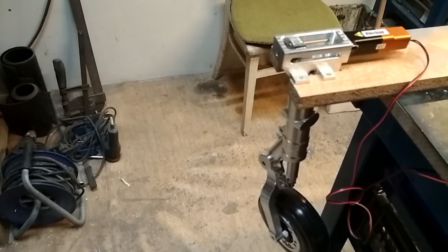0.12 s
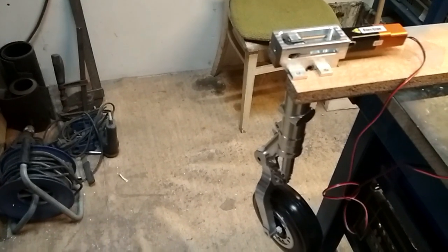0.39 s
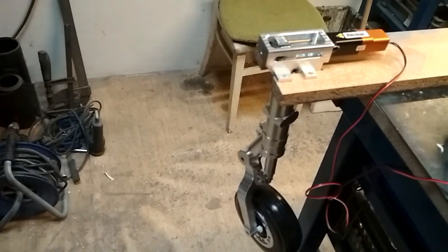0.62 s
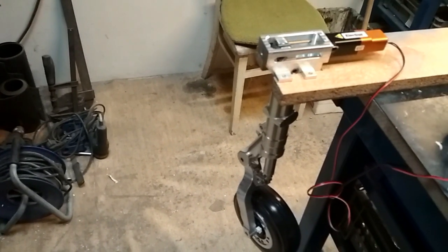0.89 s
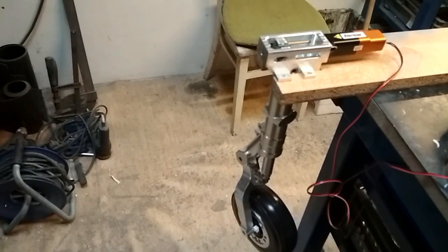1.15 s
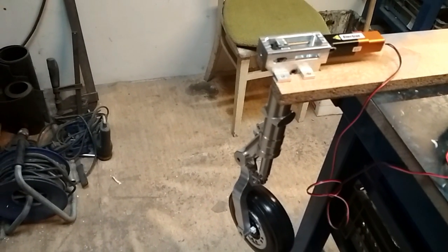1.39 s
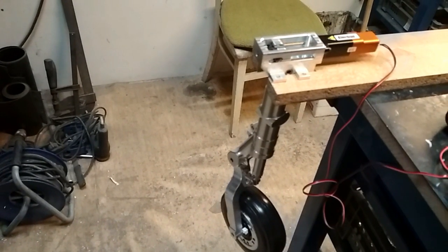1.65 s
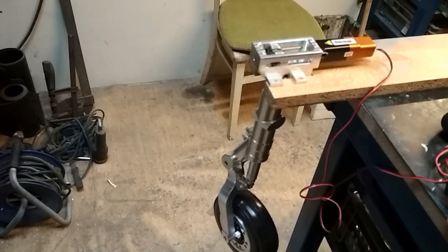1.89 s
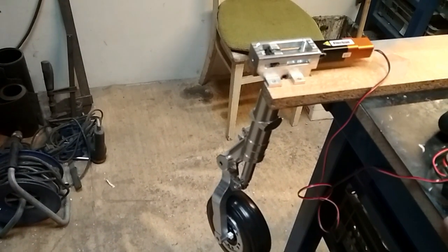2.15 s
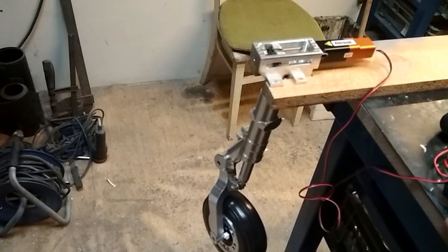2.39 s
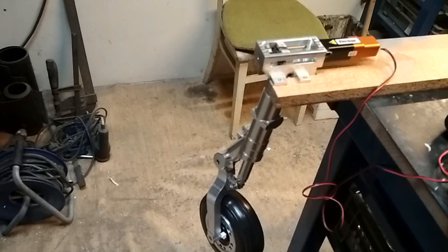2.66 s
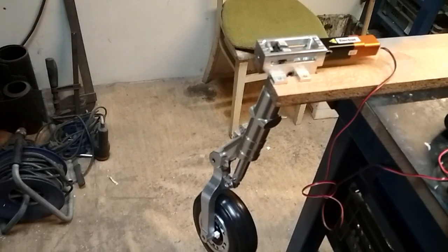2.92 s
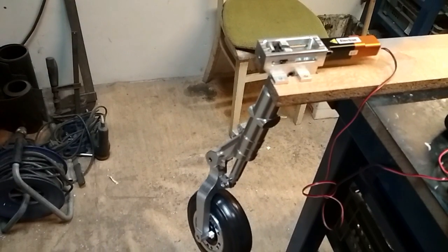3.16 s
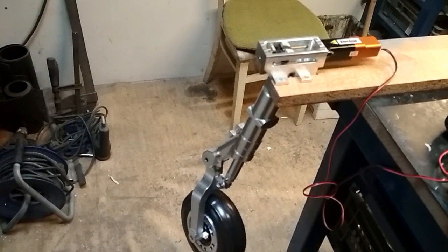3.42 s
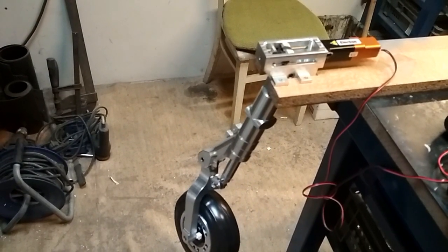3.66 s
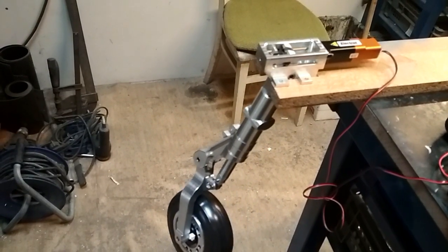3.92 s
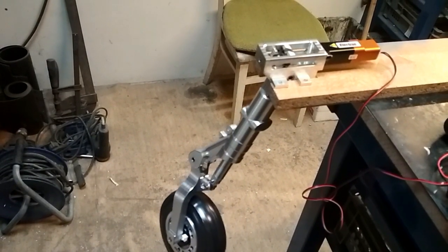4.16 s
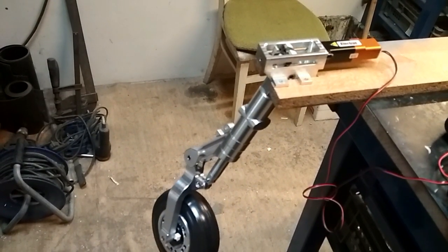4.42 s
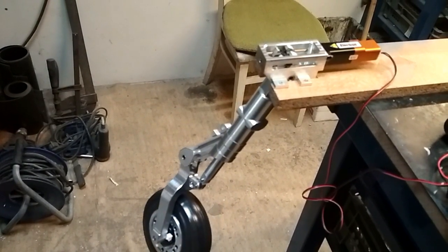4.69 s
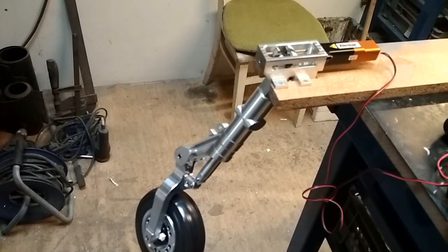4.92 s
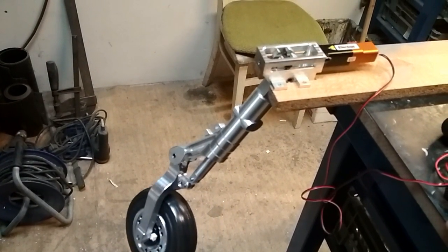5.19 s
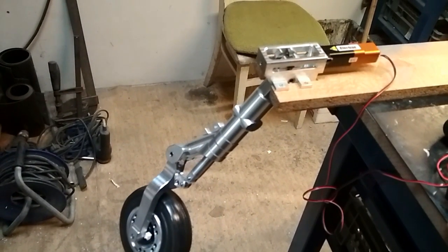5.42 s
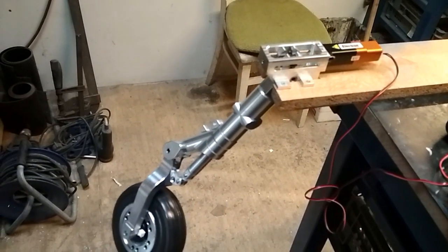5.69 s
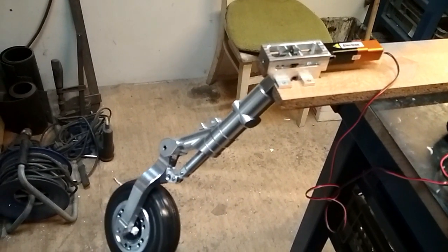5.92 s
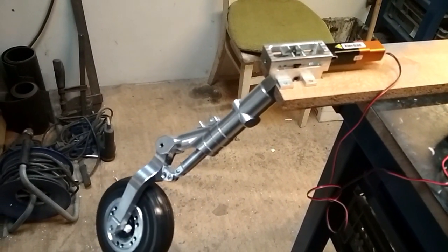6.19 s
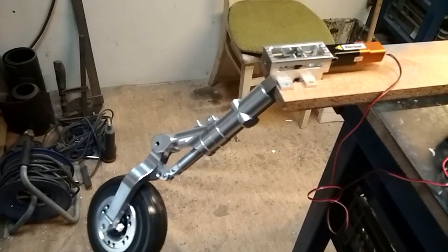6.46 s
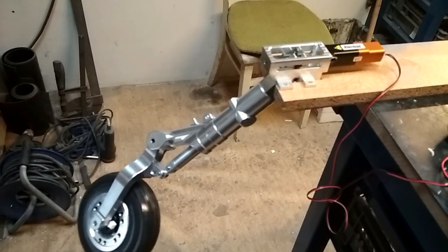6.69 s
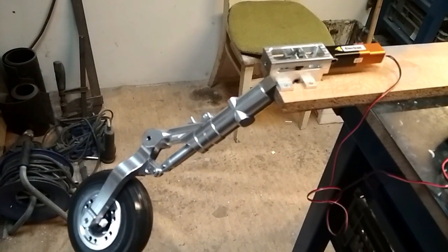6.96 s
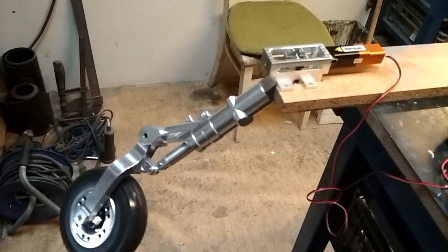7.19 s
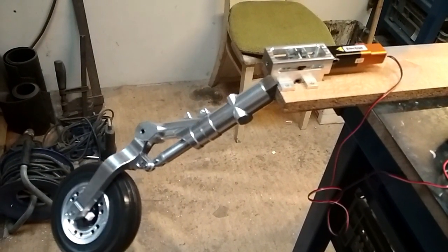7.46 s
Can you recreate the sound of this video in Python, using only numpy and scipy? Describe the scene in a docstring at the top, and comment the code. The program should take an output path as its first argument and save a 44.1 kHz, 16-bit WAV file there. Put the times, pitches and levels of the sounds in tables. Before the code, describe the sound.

A small brushed electric motor is already running at 0 s, close to a handheld stereo microphone, on a wooden bench in a quiet workshop. Its buzzing hum sits near 250 Hz with stacked overtones, under a prominent bright, grainy hiss from brushes and gear teeth; very low room rumble lies beneath. Around 0.3 s the overtone balance shifts slightly. Near 0.55 s a hand moves on the microphone with a short dull bump, and the slightly shaded treble opens into a crisper sizzle. The pitch stays nearly steady until about 3 s, then sags, rises briefly near 3.8 s and sinks again, reaching about 229 Hz by 7.6 s. As load grows, individual overtones swell and fade differently in each ear, and a slow throb of roughly four or five pulses per second deepens. The hiss grows a little stronger; the motor never stops.

```python
"""From t = 0 a small brushed motor hums in multiples of its shaft speed, near 250 turns/s, on a wooden bench.
Brush and tooth noise hisses with it, pulsed by the commutator, above the low rumble of a quiet workshop.
Near 0.55 s a hand shifts on the stereo microphone with a dull bump, and the shaded treble opens.
From about 3 s the pitch sags, rises briefly near 3.76 s, then falls to about 229 turns/s: the gear train
and lead screw lift a model landing leg, and the growing load makes the hum throb with each screw turn."""
import sys
import numpy as np
from scipy import signal
from scipy.fft import rfft, irfft
from scipy.io import wavfile
from scipy.ndimage import uniform_filter1d

SR = 44100
rng = np.random.default_rng(int(sys.argv[2]) if len(sys.argv) > 2 else 0)


def log_audio(samples):
    """Write samples as a 16-bit WAV file to the path given in sys.argv[1]."""
    # one column per channel
    frames = np.atleast_2d(samples).T
    # limit to full scale, then quantise
    limited = np.clip(frames, -1, 1)
    pcm = np.round(limited * 32767).astype(np.int16)
    wavfile.write(sys.argv[1], SR, pcm)


def volts_from_db(level):
    """Convert decibel levels to linear amplitude ratios."""
    exponent = np.asarray(level, float) / 20
    return 10 ** exponent


N = 334278   # samples

# Shaft speed before the binding of the screw: t/s, speed/(turns/s)
SHAFT_SPEED = [(0.0, 249.7), (0.15, 248.5), (0.3, 249.6), (1.25, 250.1), (1.5, 249.0), (1.8, 248.2),
               (2.1, 248.5), (3.05, 248.4), (3.4, 246.1), (3.66, 244.5), (3.76, 248.0), (4.05, 245.0),
               (4.4, 241.2), (5.25, 239.8), (5.7, 237.6), (5.84, 234.2), (6.0, 235.7), (7.1, 231.9),
               (7.58, 229.2)]
FREE_SPEED = 250   # turns/s without load
GEAR_RATIO, SCREW_START_RAD = 53.3, 3.06   # shaft turns per screw turn, first screw angle
LIGHT_LOAD, HEAVIER_LOAD = 0.45, 4.7   # speed lost/(turns/s), between which the hiss changes colour

# Orders of the strong harmonics: multiple of shaft speed
STRONG_ORDERS = [1, 2, 3, 4, 5, 6]
# Bench and room favour some pitches and cancel others; one table for each strong harmonic:
# speed lost/(turns/s), left level/dB, right level/dB, phase by which left leads/rad
STRONG_RESPONSE = [
    [(2.2, -55.5, -53.6, -.25), (3.5, -61, -60, -.2), (5, -66, -66, -.2), (6.5, -75, -74, 0),
     (8.5, -66, -63, 0), (21, -66, -62, .1)],
    [(.3, -83, -76, -.5), (2, -82, -72, -.5), (4, -86, -71, -.5), (5.5, -80, -71, -.5),
     (7.5, -85, -80, -.5), (12, -84, -81, -.5), (15, -90, -88, -.5), (21, -93, -93, -.5)],
    [(-.3, -57, -66, -2.6), (.5, -61, -63, -2.6), (1.3, -74, -54, -2.6), (2.4, -71, -54, -1),
     (3.5, -68, -58, .6), (6, -75, -65, -1.3), (9, -71, -71, -3.5), (12, -73, -63, -3), (18, -75, -59, -.2),
     (21, -64, -74, -.4)],
    [(.3, -61, -62, -2), (1.6, -56, -59, -1.7), (3, -66, -66, -1.1), (6, -68, -63, -1), (9, -75, -78, .3),
     (12, -75, -74, -.3), (14, -73, -62, -.9), (15.5, -72, -59, -.9), (17.5, -73, -64, -1.2),
     (19, -74, -66, -1.5), (21, -77, -73, -1.9)],
    [(-.3, -61, -77, 1.1), (.6, -62, -72, .7), (1.8, -71, -73, .8), (4.5, -63, -63, -.2),
     (6, -72, -69, -.8), (9, -64, -59, -.7), (12, -63, -58, -1.7), (15, -59, -66, -1.2), (18, -75, -72, -1),
     (21, -67, -64, -.3)],
    [(1.6, -65, -66, 2.9), (5, -69, -66, 3), (10, -71, -74, 2.8), (15, -76, -77, 2.4), (21, -66, -65, 2.6)],
]
# Part of each strong harmonic that arrives by shifting reflections: level/dB
STRONG_SCATTER_DB = [-76.5, -92, -75.5, -77, -76, -76.5]
# Throb with the screw, for each strong harmonic: depth/dB, lateness/rad, onset as speed lost/(turns/s)
SCREW_THROB = [(2, 0, 6), (6, -1.5, 5), (.5, .6, 11), (2.3, .4, 12), (3, 0, 13), (.5, 0, 9)]
# Opening offset of each strong harmonic (the fifth louder, the others softer): level/dB
OPENING_OFFSET_DB = [-4, -6.5, -7, -3.5, 3, -8]
OPENING_END_S, OPENING_CHANGE_S = 0.31, 0.024   # centre and time constant of the change
BENCH_SETTLE_S = 0.018   # time constant with which the bench follows a change of pitch

# Weak harmonics, before a common raise: multiple, then left and right level/dB at each of four loads
WEAK_HARMONICS = [(7, -75, -73, -76, -68, -72, -73, -75, -76), (8, -73, -77, -75, -75, -77, -75, -70, -72),
                  (9, -75, -79, -73, -74, -73, -77, -81, -78), (10, -73, -76, -79, -79, -76, -77, -74, -76),
                  (11, -74, -77, -78, -83, -82, -84, -81, -86),
                  (12, -73, -79, -76, -75, -75, -78, -78, -83),
                  (13, -76, -79, -76, -75, -77, -77, -80, -81),
                  (14, -74, -79, -75, -78, -79, -78, -80, -81),
                  (15, -73, -78, -71, -77, -73, -76, -73, -78),
                  (16, -77, -78, -75, -78, -77, -87, -78, -81),
                  (17, -75, -81, -77, -82, -75, -79, -75, -81),
                  (18, -75, -78, -74, -81, -79, -80, -80, -80),
                  (19, -82, -81, -78, -83, -74, -77, -81, -84),
                  (20, -80, -85, -77, -90, -82, -81, -75, -81),
                  (21, -83, -83, -83, -88, -78, -81, -80, -91),
                  (22, -85, -82, -79, -81, -85, -84, -79, -84),
                  (23, -85, -86, -89, -88, -79, -80, -86, -89),
                  (24, -79, -76, -79, -77, -79, -79, -77, -83),
                  (25, -83, -83, -82, -80, -81, -83, -84, -81),
                  (26, -86, -82, -87, -84, -87, -87, -90, -90),
                  (27, -84, -80, -86, -80, -85, -81, -87, -85),
                  (28, -80, -78, -80, -78, -80, -82, -79, -78)]
# The four loads: speed lost/(turns/s)
WEAK_LOADS_LOST = [.3, 1.7, 6.5, 16]
WEAK_WAVER_DB, WEAK_SCATTER_DB = 2.5, -9   # level waver, shifting reflections relative to the tone
WEAK_WANDER_RAD = 0.035   # phase wander per multiple
# Faint tones between the harmonics: multiple of shaft speed, left level/dB, right level/dB,
# onset as speed lost/(turns/s)
FRACTIONAL_TONES = [(1.67, -88, -87, 9), (3.205, -84, -78, 9), (3.78, -84, -80, 11), (5.5, -82, -82, -5),
                    (23.2, -82, -82, -3), (25.2, -81, -81, -5)]

# Hiss, before a common raise: t/s, level/dB, housing resonance f/Hz, resonance height/dB
HISS_COURSE = [(0, -54, 11300, 0), (.5, -53.3, 11400, 1), (.6, -52.3, 11550, 4.5), (.95, -51, 11800, 6),
               (1.8, -51, 12100, 5), (3.5, -50.5, 12150, 4), (5, -50, 12200, 4), (6.5, -49.5, 12250, 4),
               (7.25, -49, 12300, 3), (7.58, -49, 12200, 4)]
# Relative hiss spectrum: f/Hz, light load left level/dB, light load right level/dB,
# heavier load left level/dB, heavier load right level/dB, likeness of the ears (0 to 1)
HISS_SPECTRUM = [(200, -17, -16, -17, -16, .5), (290, -14, -13, -24, -22, .45),
                 (335, -25, -23, -31, -31, .35), (390, -28, -28, -16, -15, .4),
                 (460, -29, -29, -23, -22, .3), (530, -26, -24, -24, -23, .4),
                 (600, -21, -18, -20, -18, .6), (720, -17, -18, -15, -15, .45),
                 (820, -15, -18, -17, -20, .3), (920, -14, -16, -11, -13, .3),
                 (1150, -13, -12, -11, -7, .3), (1400, -15, -15, -12, -11, .25),
                 (1550, -22, -23, -20, -19, .25), (1750, -16, -17, -15, -15, .3),
                 (2100, -12, -13, -12, -13, .45), (2800, -13, -16, -11, -13, .4),
                 (3300, -14, -15, -11, -12, .45), (3900, -11, -14, -9, -12, .5),
                 (4500, -11, -15, -10, -12, .4), (5300, -16, -18, -11, -15, .25),
                 (6000, -16, -16, -12, -12, .3), (7000, -12, -9, -12, -9, .25), (8100, -6, -6, -7, -3, .2),
                 (8900, -9, -3, -8, -3, .2), (10200, -7, 0, -5, 2, .3), (11300, -5, -1, -4, -2, .2),
                 (12200, -3, -2, -1, -3, .2), (13300, -2, -4, 1, -3, .2), (14300, -6, -9, -5, -9, .2),
                 (15200, -11, -11, -9, -9, .3), (15800, -12, -13, -11, -12, .4)]
# Brush noise on each of the five commutator segments: level/dB
BRUSH_SEGMENT_DB = [0.43, -1.9, 0.78, -1, -0.32]
HOUSING_WIDTH_HZ = 650   # full width at half the dB height
LEFT_LAG_S = 7.5 / SR   # left ear behind right
# Shading of the treble until the hand shifts, left then right: level/dB
HAND_SHADE_DB = [-4.5, -0.5]
SHADE_HZ, SHADE_WIDTH_HZ = 8800, 4600

# Relative rumble spectrum: f/Hz, level/dB
ROOM_SPECTRUM = [(25, -13), (40, 1.5), (55, -9), (67, 8), (85, -6.5), (105, -1.5), (135, 2.5), (170, -9),
                 (260, 3), (500, -59)]
ROOM_DB, ROOM_LIKENESS = -76, 0.69   # mean rumble level, likeness of the ears
# Shifts of the hand on the microphone: t/s, nominal level/dB (the pulse shape scales it)
HAND_SHIFTS = [(0.549, -56)]

# Gate threshold relative to the spectral surroundings: f/Hz, level/dB
GATE_THRESHOLD = [(1300, -40), (1550, -7), (1900, -7), (2500, -3.6), (3200, -2.6), (4000, -2.7),
                  (6000, -1.5), (8000, -2.4), (11000, -5.5), (13000, -4.5), (14200, -3), (15000, -2.3)]
FRAME = 1024   # samples per spectral frame


def rms_one(x):
    """Normalise a signal to unit root-mean-square value."""
    return x / np.sqrt(np.mean(x ** 2) + 1e-20)


def in_time(rows):
    """Interpolate the columns of a time table linearly, one value per sample."""
    s, *columns = np.transpose(rows)
    return [np.interp(np.arange(N) / SR, s, c) for c in columns]


def in_pitch(rows, hz):
    """Interpolate the columns of a spectral table on a logarithmic frequency axis."""
    at, *columns = np.transpose(rows)
    return [np.interp(np.log(hz + 1), np.log(at), c) for c in columns]


def drift(rate_hz, count):
    """Rows of slow random fluctuation of unit rms: white noise through two equal low-pass poles."""
    step = 40   # samples between drawn values
    r = np.exp(-2 * np.pi * rate_hz * step / SR)
    white = rng.standard_normal((count, N // step + 2002))
    slow = signal.lfilter([1], [1, -2 * r, r * r], white)[:, 2000:]
    at = np.arange(N) / step
    return np.array([np.interp(at, np.arange(len(row)), rms_one(row)) for row in slow])


def field(shape, bins, frames):
    """Random field of unit rms, smoothed over frequency bins and time frames."""
    smooth = uniform_filter1d(rng.standard_normal(shape), size=int(frames), axis=-1)
    return rms_one(uniform_filter1d(smooth, size=int(bins), axis=-2))


def shaft():
    """Angle is the integral of speed; the lead screw binds once a turn, more strongly under load."""
    speed, = in_time(SHAFT_SPEED)
    load = np.clip(FREE_SPEED - speed, 0, None)
    screw = 2 * np.pi * np.cumsum(speed) / SR / GEAR_RATIO + SCREW_START_RAD
    speed = speed + (0.25 + 0.055 * load) * np.cos(screw)
    unsteady = speed + 0.35 * drift(9, count=1)[0]
    angle = 2 * np.pi * np.cumsum(unsteady) / SR
    return angle, screw, load, FREE_SPEED - speed


def screw_swell(screw, load):
    """Phase of the swell per screw turn: it lags more as speed falls below the bench resonance."""
    return screw - 2.6 - 0.15 * load


def strong_harmonics(angle, screw, load, lost):
    """Harmonics of rotation pass bench and room resonances, so each swells and sinks with speed."""
    out = np.zeros((2, N))
    r = np.exp(-1 / (BENCH_SETTLE_S * SR))
    settled = signal.lfilter([1 - r], [1, -r], lost, zi=[r * lost[0]])[0]
    swell = screw_swell(screw, load)
    opening = (1 - np.tanh((np.arange(N) / SR - OPENING_END_S) / OPENING_CHANGE_S)) / 2
    settings = zip(STRONG_ORDERS, STRONG_RESPONSE, SCREW_THROB, STRONG_SCATTER_DB, OPENING_OFFSET_DB)
    for k, rows, (depth_db, behind, onset), scatter_db, opening_db in settings:
        at, *columns = np.transpose(rows)
        left_db, right_db, lead = [np.interp(settled, at, c) for c in columns]
        beat = swell - behind
        loaded = np.clip((load - onset) / 3, 0, 1)
        throb_db = depth_db * loaded * (np.cos(beat) - 0.42 * np.cos(2 * beat))
        waver_db = 0.25 * np.sqrt(k) * drift(20, count=1)   # higher harmonics waver more
        level = volts_from_db(np.array([left_db, right_db]) + throb_db + opening_db * opening + waver_db)
        phase = k * angle + k * k + lead * np.array([[1], [0]])
        # reflections in phase and in quadrature, separate for each ear
        in_step, across = volts_from_db(scatter_db) * drift(9.8, count=4).reshape(2, 2, N)
        out += (level + in_step) * np.cos(phase) + across * np.sin(phase)
    return np.sqrt(2) * out   # table levels are rms


def weak_harmonics(angle, load):
    """Higher harmonics of rotation, whose levels depend on load and whose phases wander at random."""
    out = np.zeros((2, N))
    for k, *level_db in WEAK_HARMONICS:
        ears_db = [np.interp(load, WEAK_LOADS_LOST, ear) for ear in np.reshape(level_db, (-1, 2)).T]
        waver, shift, *wander = drift(9.3, count=4)
        level = volts_from_db(ears_db + WEAK_WAVER_DB * waver + 1.6)
        level = level * (1 + volts_from_db(WEAK_SCATTER_DB) * shift * [[1], [-1]])
        # path difference between the ears, turned at random by reflections
        late = 2 * np.pi * k * FREE_SPEED * LEFT_LAG_S + rng.normal(0, 0.35)
        wander = WEAK_WANDER_RAD * k * np.array(wander)
        out += level * np.cos(k * angle + k * k - np.array([[late], [0]]) + wander)
    return np.sqrt(2) * out


def fractional_tones(angle, screw, load):
    """Faint tones at fractional multiples of shaft speed, amplitude-modulated once per screw turn."""
    out = np.zeros((2, N))
    swell = screw_swell(screw, load)
    for k, *level_db, onset in FRACTIONAL_TONES:
        loaded = np.clip((load - onset) / 5, 0, 1)
        level = volts_from_db(np.c_[level_db] - 4 * np.cos(swell + 1) + 2 * drift(5, count=1))
        out += loaded * level * np.cos(k * angle)
    return np.sqrt(2) * out


def brush_noise(angle, screw):
    """Sliding contact gives white noise, amplitude-modulated by commutator segments and screw effort."""
    segment = len(BRUSH_SEGMENT_DB) * angle / (2 * np.pi)
    segment_db = np.take(BRUSH_SEGMENT_DB, segment.astype(int) % len(BRUSH_SEGMENT_DB))
    pulse_db = segment_db + 2 * np.cos(2 * np.pi * segment + np.pi)
    grain_db = 0.5 * uniform_filter1d(rng.standard_normal(N), size=25) * 5   # 0.5 dB rms
    effort_db = 0.3 * drift(6, count=1) - 0.55 * np.cos(screw - 1.1)
    return rng.standard_normal((3, N)) * volts_from_db(pulse_db + grain_db + effort_db)


def hiss(angle, screw, load):
    """Brush and tooth noise is coloured by load and housing resonance; reflections decorrelate the ears."""
    level_db, centre_hz, housing_db = in_time(HISS_COURSE)
    hz, s, (direct, *own) = signal.stft(brush_noise(angle, screw), SR, nperseg=FRAME)
    at = np.minimum((s * SR).astype(int), N - 1)
    f = hz[:, None]
    spectrum = np.array(in_pitch(HISS_SPECTRUM, hz))[:, :, None]
    left_light, right_light, left_heavier, right_heavier, alike = spectrum
    loaded = (load - LIGHT_LOAD) / (HEAVIER_LOAD - LIGHT_LOAD)
    loaded = np.clip(loaded[at], 0, 1)
    housing = 1 / (1 + (2 * (f - centre_hz[at]) / HOUSING_WIDTH_HZ) ** 2)
    # direct sound and the housing ring are shared; reflections differ between the ears
    alike = np.clip(alike, 0, 0.9)
    alike = alike + (0.9 - alike) * 0.5 * housing
    late = np.exp(-2j * np.pi * f * LEFT_LAG_S)
    # narrow bands of the hiss rise and fall at random, partly alike in both ears
    shape = (3, *direct.shape)
    chance = field(shape, bins=2, frames=60) + 0.5 * field(shape, bins=3, frames=6)
    band_depth_db = 2.5 * np.interp(hz, [800, 2500, 7000, 11000], [0.2, 1, 1, 0.7])[:, None]
    bands_db = band_depth_db * (chance[0] + 0.6 * chance[1:])
    shade = (s < HAND_SHIFTS[0][0]) / (1 + (2 * (f - SHADE_HZ) / SHADE_WIDTH_HZ) ** 2)
    low_cut = 1 / np.sqrt(1 + (210 / (f + 1)) ** 8)
    ears = []
    settings = zip((left_light, right_light), (left_heavier, right_heavier), (late, 1), own,
                   bands_db, HAND_SHADE_DB)
    for light_db, heavier_db, lag, diffuse, band_db, shade_db in settings:
        # random patches of the hiss swell and sink, separately in each ear
        patches_db = 0.23 * field(direct.shape, bins=21, frames=11)
        colour_db = light_db + loaded * (heavier_db - light_db) + housing_db[at] * housing
        gain = low_cut * volts_from_db(colour_db + patches_db + band_db + shade_db * shade)
        ears.append(gain * (np.sqrt(alike) * lag * direct + np.sqrt(1 - alike) * diffuse))
    out = signal.istft(np.array(ears), SR, nperseg=FRAME)[1][:, :N]
    slow_rms = np.sqrt(uniform_filter1d(np.mean(out ** 2, axis=0), size=SR, mode="reflect"))
    return volts_from_db(level_db + 3.5) * out / slow_rms


def room_rumble():
    """Low room noise is partly coherent: a common part plus a part of opposite sign in the two ears."""
    colour_db, = in_pitch(ROOM_SPECTRUM, np.arange(N // 2 + 1) * SR / N)
    mid, side = irfft(rfft(rng.standard_normal((2, N))) * volts_from_db(colour_db), N)
    ears = np.sqrt(1 + ROOM_LIKENESS) * mid + np.sqrt(1 - ROOM_LIKENESS) * side * [[1], [-1]]
    return volts_from_db(ROOM_DB + 2 * drift(7.4, count=1)) * rms_one(ears)


def hand_bumps():
    """A shift of grip displaces the microphone: a short damped pressure pulse with one reversal."""
    out = np.zeros((2, N))
    for s, level_db in HAND_SHIFTS:
        age = np.clip(np.arange(N) / SR - s, 0, None) / 0.002   # in decay times of 2 ms
        pulse = age * (1.6 - age) * np.exp(-age)
        out += volts_from_db(level_db + 4) * pulse * np.array([[1.1], [0.8]])
    return out


def scene():
    """Superpose the hum and hiss, which share one shaft motion, with the room and the hand."""
    angle, screw, load, lost = shaft()
    whine = strong_harmonics(angle, screw, load, lost) + weak_harmonics(angle, load)
    whine = whine + fractional_tones(angle, screw, load)
    return whine + hiss(angle, screw, load) + room_rumble() + hand_bumps()


def top_cut(x):
    """Nothing passes above the cut-off."""
    return signal.sosfilt(signal.butter(12, 15790, fs=SR, output="sos"), x)


def record(dry):
    """A spectral gate attenuates by 24 dB the narrow slots that fall below their surroundings."""
    hz, s, spectrum = signal.stft(dry, SR, nperseg=FRAME)
    power = uniform_filter1d(abs(spectrum) ** 2, size=3, axis=1)
    power = uniform_filter1d(power, size=3, axis=2)
    level_db = 10 * np.log10(power + power[::-1] + 1e-20)   # both ears together
    around_db = uniform_filter1d(uniform_filter1d(level_db, size=41, axis=1), size=40, axis=2)
    threshold_db, = in_pitch(GATE_THRESHOLD, hz)
    below = level_db - around_db < threshold_db[:, None]
    shut = uniform_filter1d(1.0 * below, size=3, axis=1) > 0.3   # spreads to the adjacent bins
    gated = signal.istft(spectrum * np.where(shut, volts_from_db(-24), 1), SR, nperseg=FRAME)[1][:, :N]
    return top_cut(gated)


dry = scene()
out = record(dry)
log_audio(out)
```